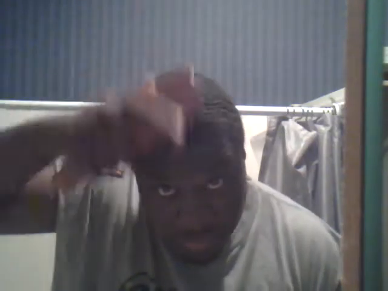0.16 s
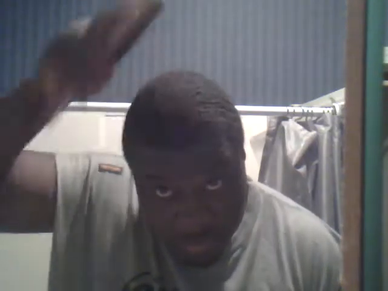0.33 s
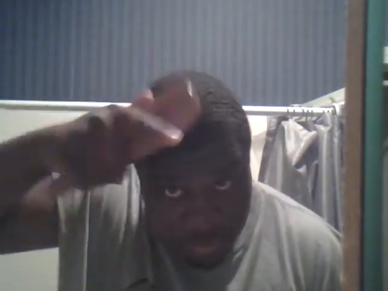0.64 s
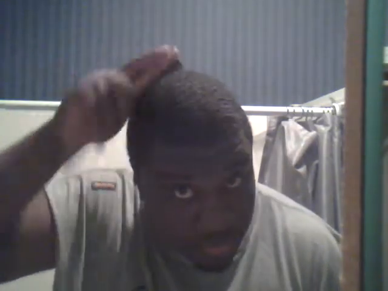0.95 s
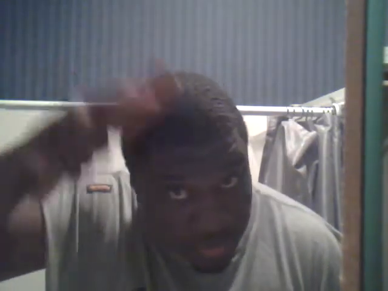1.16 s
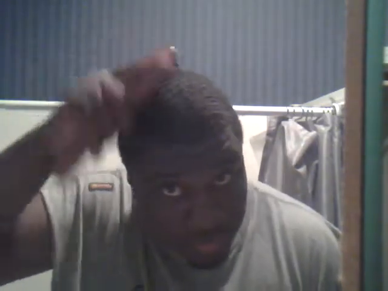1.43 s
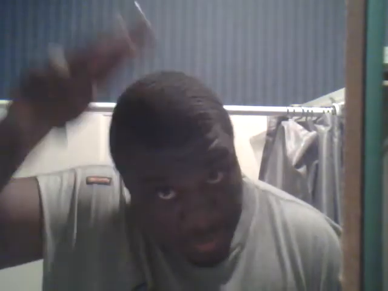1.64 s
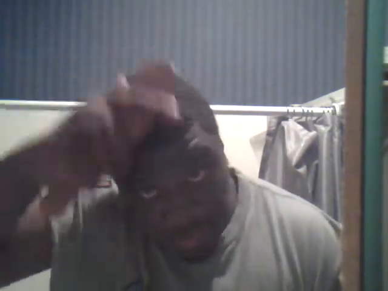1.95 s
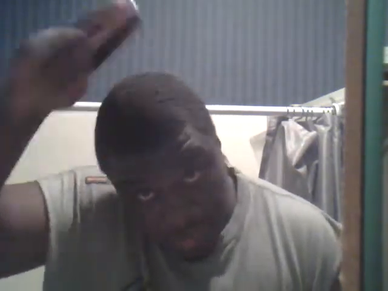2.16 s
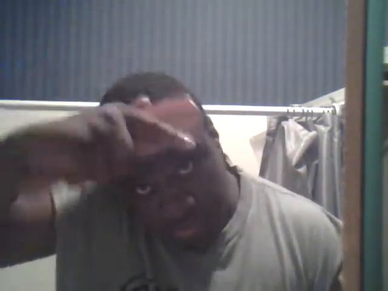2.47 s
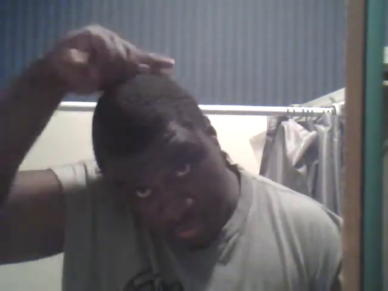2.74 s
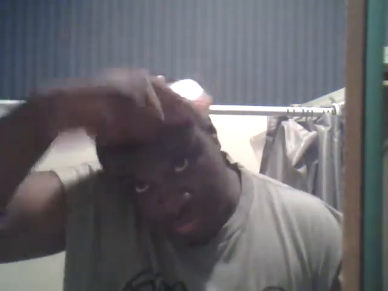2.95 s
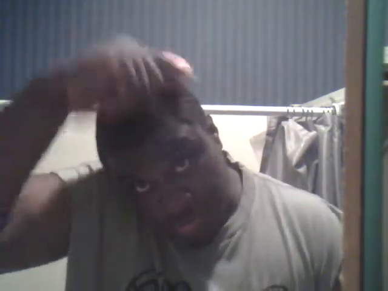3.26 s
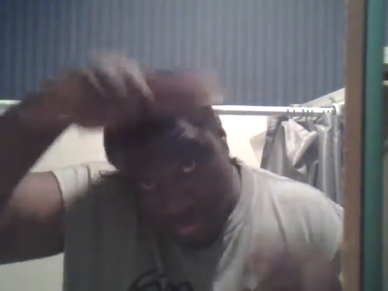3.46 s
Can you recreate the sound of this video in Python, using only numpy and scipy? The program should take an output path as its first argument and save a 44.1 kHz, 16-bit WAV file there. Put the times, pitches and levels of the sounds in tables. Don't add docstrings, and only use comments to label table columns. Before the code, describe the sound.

Hair brush swishing over short hair in brisk, even strokes, over a steady low fan drone

```python
import sys
import numpy as np
from scipy import signal
from scipy.fft import rfft, irfft
from scipy.io import wavfile
from scipy.ndimage import uniform_filter1d

SR = 44100
rng = np.random.default_rng(int(sys.argv[2]) if len(sys.argv) > 2 else 0)


def invert_db(x):
    u = np.asarray(x, float) / 20
    return 10 ** u


def master(y):
    cut = np.clip(np.atleast_2d(y).T, -1, 1)
    pcm = np.round(cut * 32767)
    wavfile.write(sys.argv[1], SR, pcm.astype(np.int16))


N = 158760


def unit(x):
    return x / np.sqrt(np.mean(x ** 2))


def seconds():
    return np.arange(N) / SR


def freqs():
    return np.maximum(np.arange(N // 2 + 1) * SR / N, 1)


def curve(table, order=1):
    table = np.array(table, float)
    return np.interp(np.log(freqs()), np.log(table[:, 0]), table[:, order])


def peaks(table):
    power = 0
    for hz, width_hz, db in table:
        power = power + invert_db(2 * db) / (1 + (2 * (freqs() - hz) / width_hz) ** 2) ** 2
    return np.sqrt(power)


def colour(x, gain):
    return irfft(rfft(x) * gain, N)


def walk(rate_hz):
    hold = int(SR / rate_hz)
    steps = np.repeat(rng.standard_normal(N // hold + 1), hold)
    slewed = uniform_filter1d(uniform_filter1d(steps, hold), hold)
    return unit(slewed[:N])


# f/Hz, level/dB per Hz
DRONE_SPECTRUM = [(30, -57), (110, -24.5), (230, -6), (265, -3.5), (420, -13.5), (600, -11), (700, -18),
                  (1150, -29.5)]
# f/Hz, width/Hz, peak level/dB per Hz
ROOM_MODES = [(169.3, 9, -7), (196, 13, -10), (256, 20.6, -2), (459, 5.4, -1.5), (484, 19, -12),
              (544, 7.6, -6.5), (640.4, 29.6, -7.5), (752, 8.7, -13), (802, 33, -15.5), (850, 5, -25),
              (1104, 41, -16), (1453, 36, -14), (1524, 9.3, -12), (279, 31.3, -5.5)]
# f/Hz, width/Hz, depth/dB
ROOM_NULLS = [(150.3, 18.7, -5.5), (224.5, 12.6, -20), (415, 17, -4.5), (515, 23, -4.5), (697, 24, -18),
              (1058, 37, -16)]
DRONE_DB, DRONE_WALK_DB, DRONE_WALK_HZ = -31.5, 0.4, 10.3


def drone():
    null_db = 0
    for hz, width_hz, db in ROOM_NULLS:
        null_db = null_db + db / (1 + (2 * (freqs() - hz) / width_hz) ** 4)
    broad = invert_db(curve(DRONE_SPECTRUM)) * (freqs() < 1300)
    gain = np.hypot(broad, peaks(ROOM_MODES)) * invert_db(null_db)
    return colour(rng.standard_normal(N) * invert_db(DRONE_WALK_DB * walk(DRONE_WALK_HZ)), gain)


# f/Hz, level re shared part/dB, phase/rad
PORT_DIFFERENCE = [(100, -9, 1.4), (165, -39, 2.5), (300, -17, 2.2), (420, -20, 3.5), (520, -18, 3.9),
                   (674, 1.5, 4.2), (736, -6, 9), (850, -22, 7.5)]
# f/Hz, level/dB per Hz
PORT_AIR = [(60, -46), (100, -30), (200, -19.5), (380, -15.5), (600, -29), (850, -42), (1030, -25),
            (1200, -58)]


def port_difference(shared):
    phase = np.exp(1j * curve(PORT_DIFFERENCE, order=2))
    turned = colour(shared, invert_db(curve(PORT_DIFFERENCE)) * phase * (freqs() < 1050))
    return turned + colour(rng.standard_normal(N), invert_db(curve(PORT_AIR)) * (freqs() < 1300))


# f/Hz, level/dB per Hz
FAN_HISS = [(950, -45), (1100, -23.5), (1500, -21.5), (1900, -28), (3200, -30.5), (4600, -39.5),
            (9500, -42), (15500, -47.5)]
# f/Hz, width/Hz, level/dB per Hz
FAN_WHINE = [(5560, 66, -25.5), (11170, 540, -31), (6600, 3100, -39)]
HISS_FLICKER_DB, HISS_FLICKER_HZ = 0.4, 14


def fan_treble():
    flicker = invert_db(HISS_FLICKER_DB * walk(HISS_FLICKER_HZ))
    hiss = colour(rng.standard_normal(N) * flicker, invert_db(curve(FAN_HISS)) * (freqs() > 900))
    return hiss + colour(rng.standard_normal(N), peaks(FAN_WHINE))


TONE_HZ = [119.9, 239.9, 627.2]
# shared level/dB, difference level/dB, difference phase/rad
TONE_LEVELS = [(-61.5, -44.5, -2), (-40, -48, 3.5), (-42, -48.5, 4.5)]


def hum():
    shared, apart = 0, 0
    for hz, (shared_db, apart_db, phase) in zip(TONE_HZ, TONE_LEVELS):
        angle = 2 * np.pi * hz * seconds()
        shared = shared + np.sqrt(2) * invert_db(shared_db) * np.sin(angle)
        apart = apart + np.sqrt(2) * invert_db(apart_db) * np.sin(angle + phase)
    return shared, apart


def fans():
    shared = drone()
    apart = port_difference(shared)
    hiss = fan_treble()
    scale = invert_db(DRONE_DB) / np.sqrt(np.mean(shared ** 2))
    hum_shared, hum_apart = hum()
    return shared * scale + hum_shared, apart * scale + hum_apart, hiss * scale


THUD_S, THUD_HZ, THUD_DB, THUD_T60_S, THUD_ATTACK_S = 1.29, 102.3, -35.5, 0.22, 0.017


def thud():
    t = np.maximum(seconds() - THUD_S, 0)
    decay = invert_db(THUD_DB - 60 * t / THUD_T60_S)
    return decay * np.sin(2 * np.pi * THUD_HZ * t) * np.minimum(t / THUD_ATTACK_S, 1)


FLICKS_PER_S, FLICK_SPREAD_DB = 16000, 1.6


def flicks():
    size = invert_db(FLICK_SPREAD_DB * rng.exponential(size=N)) * rng.standard_normal(N)
    return unit(size * (rng.random(N) < FLICKS_PER_S / SR))


ATTACK_S, RELEASE_S = 0.062, 0.085


def contact(start_s, length_s, start_db, end_db):
    t = seconds() - start_s
    rise = np.clip(1 - t / ATTACK_S, 0, 1)
    fall = np.clip(1 - (length_s - t) / RELEASE_S, 0, 1)
    gain = invert_db(start_db * rise ** 2 + end_db * fall ** 2) * (t > 0) * (t < length_s)
    return gain, np.clip(t / length_s, 0, 1)


# t/s, length/s, level/dB, brightness/dB
SLEEVE_RUSTLES = [
    (1.35, 0.33, -53, -8.5),
    (1.827, 0.067, -66, -14),
    (2.284, 0.067, -55, -8),
    (2.81, 0.066, -57, -8),
    (3.207, 0.18, -52.5, -2),
    (3.335, 0.23, -50, -3.5),
    (3.53, 0.17, -57, -10),
]
# f/Hz, width/Hz, level/dB
CLOTH_BODY = [(3000, 550, 5), (4400, 900, -2)]
# f/Hz, width/Hz, level/dB
CLOTH_TREBLE = [(6720, 2300, 0)]
RUSTLE_EDGE_DB, RUSTLE_GAIN_DB = -5.5, 17
CLOTH_DRAG_DB, CLOTH_DRAG_HZ = 1.5, 30


def sleeve():
    body, treble = 0, 0
    for start_s, length_s, db, bright_db in SLEEVE_RUSTLES:
        touch, _ = contact(start_s, length_s, RUSTLE_EDGE_DB, RUSTLE_EDGE_DB)
        touch = touch * invert_db(db + RUSTLE_GAIN_DB)
        body = body + touch
        treble = treble + touch * invert_db(bright_db)
    drag = invert_db(CLOTH_DRAG_DB * walk(CLOTH_DRAG_HZ))
    body_sound = colour(flicks() * body * drag, peaks(CLOTH_BODY))
    return body_sound + colour(flicks() * treble * drag, peaks(CLOTH_TREBLE))


# t/s, length/s, level/dB, bristle ring/dB, pressure peak/share of stroke
BRUSH_STROKES = [
    (-.2, .24, -33, 2.5, 0.63),
    (0.254, 0.23, -31, 3.5, 0.37),
    (0.696, 0.23, -32, 4.5, 0.41),
    (1.132, 0.23, -32.5, 2.5, 0.47),
    (1.577, .24, -33.5, 4, 0.36),
    (2.024, 0.28, -33, -2, 0.33),
    (2.496, .25, -33.5, 3, 0.37),
    (2.95, 0.28, -36, -2.5, 0.41),
    (3.406, 0.23, -37, 1, .33),
]
# f/Hz, level/dB per Hz
HAIR_HISS = [(1200, -30.5), (2200, 2.5), (3600, 0), (5000, -5.5), (7500, 4), (11000, -1.5), (15500, -5.5)]
# f/Hz, width/Hz, level/dB
RING_LANDING = [(6800, 940, 7), (7800, 540, -33)]
# f/Hz, width/Hz, level/dB
RING_LEAVING = [(6250, 1600, 11)]
# f/Hz, width/Hz, level/dB
SCALP_SCRAPE = [(3230, 450, -5), (3980, 400, -6)]
STROKE_START_DB, STROKE_END_DB, SCALP_LATE_DB = -16, -15, 16.5
BEFORE_PEAK_DB, AFTER_PEAK_DB = -11.5, -12
RING_FOLLOWS = 0.83
BRISTLE_DRAG_DB, BRISTLE_DRAG_HZ = 0.95, 37


def brush():
    hair, landing, leaving, scalp = 0, 0, 0, 0
    for start_s, length_s, db, ring_db, peak in BRUSH_STROKES:
        touch, way = contact(start_s, length_s, STROKE_START_DB, STROKE_END_DB)
        press_db = BEFORE_PEAK_DB * np.maximum(peak - way, 0) + AFTER_PEAK_DB * np.maximum(way - peak, 0)
        touch = touch * invert_db(db + press_db)
        ring = touch * invert_db(ring_db + RING_FOLLOWS * press_db)
        hair = hair + touch
        scalp = scalp + touch * invert_db(SCALP_LATE_DB * way)
        landing = landing + ring * np.sqrt(1 - way)
        leaving = leaving + ring * np.sqrt(way)
    drag = invert_db(BRISTLE_DRAG_DB * walk(BRISTLE_DRAG_HZ))
    layers = ((hair, invert_db(curve(HAIR_HISS)) * (freqs() > 900)),
              (landing * drag, peaks(RING_LANDING)),
              (leaving * drag, peaks(RING_LEAVING)),
              (scalp, peaks(SCALP_SCRAPE)))
    return sum(colour(flicks() * level * drag, gain) for level, gain in layers)


ROOM_DB, ROOM_T60_S, ROOM_GAP_S = -12, 0.16, 0.004


def room(x):
    t = np.arange(int(0.4 * SR)) / SR
    tail = rng.standard_normal(len(t)) * invert_db(-60 * t / ROOM_T60_S) * (t > ROOM_GAP_S)
    tail = tail / np.sqrt(np.sum(tail ** 2))
    return x + invert_db(ROOM_DB) * signal.fftconvolve(x, tail)[:N]


SCATTER_SHARE = 0.62


def scattered(x):
    cells = signal.stft(x, nperseg=1024)[2]
    stir = np.exp(2j * np.pi * rng.random(cells.shape))
    turn = np.angle(np.sqrt(1 - SCATTER_SHARE) + np.sqrt(SCATTER_SHARE) * stir)
    y = signal.istft(cells * np.exp(1j * turn), nperseg=1024)[1][:N]
    return unit(y) * np.sqrt(np.mean(x ** 2))


NULL_EDGE = 0.25


def hollow(gain):
    return gain * np.clip(np.abs(gain) / NULL_EDGE, 0, 1) ** 2


PORT_LAG_SAMPLES, AIR_WIDTH_DB = 16.95, -1
THUD_SHARED_DB, THUD_LAG_SAMPLES = -4, 90


def scene():
    shared, apart, hiss = fans()
    bump = thud()
    air = room(brush() + sleeve()) + hiss
    late = np.exp(-2j * np.pi * freqs() * PORT_LAG_SAMPLES / SR)
    air_mid = colour(air, hollow((1 - late) / 2))
    air_side = invert_db(AIR_WIDTH_DB) * colour(scattered(air), hollow((1 + late) / 2))
    mid = shared + invert_db(THUD_SHARED_DB) * np.roll(bump, THUD_LAG_SAMPLES) + air_mid
    side = apart + bump - air_side
    return np.array([mid + side, mid - side])


def roll_off(x):
    return signal.sosfilt(signal.butter(12, 16180, fs=SR, output="sos"), x)


TOP_HZ = 15720


def record(dry):
    top_cut = signal.ellip(14, 0.2, 80, TOP_HZ, fs=SR, output="sos")
    mix = signal.sosfilt(top_cut, dry)
    return roll_off(mix)


dry = scene()
out = record(dry)
master(out)
```